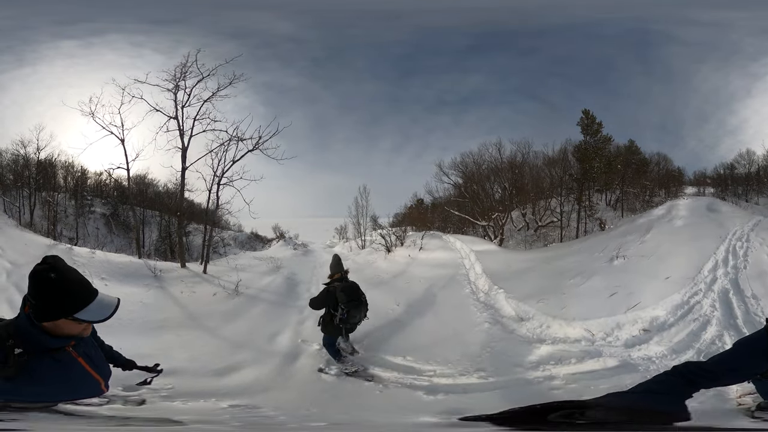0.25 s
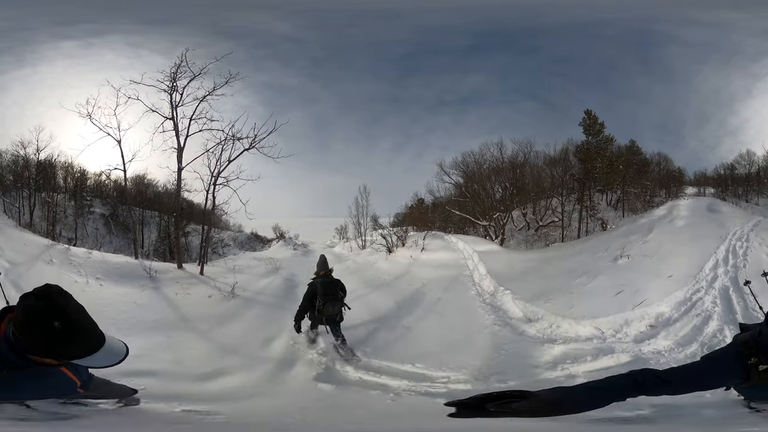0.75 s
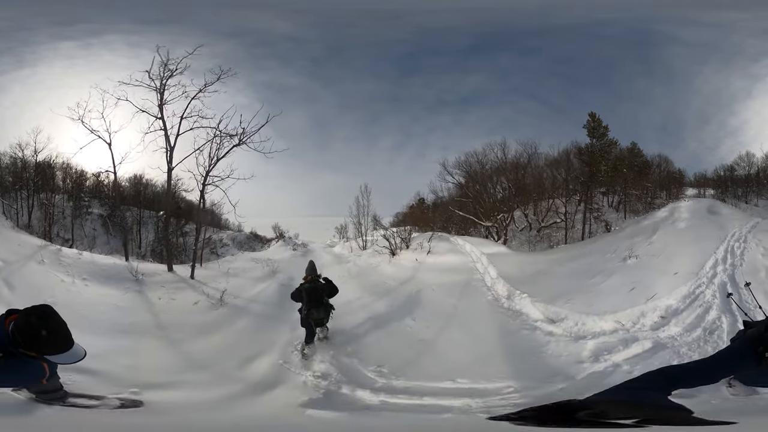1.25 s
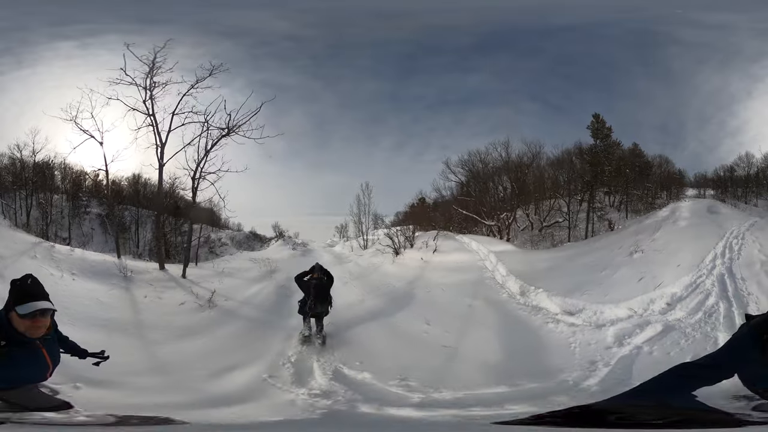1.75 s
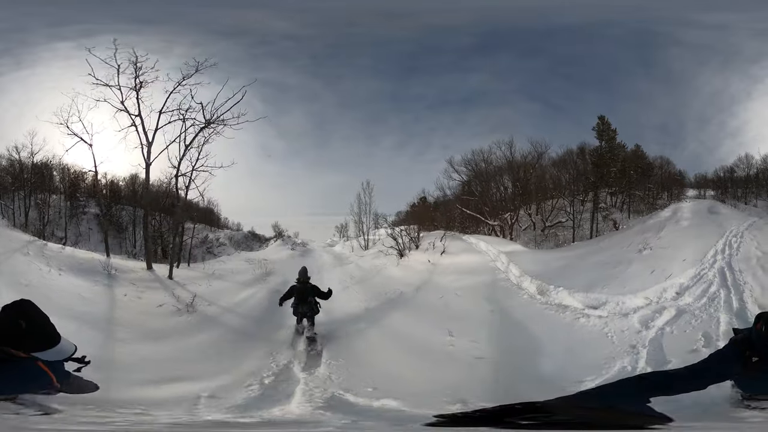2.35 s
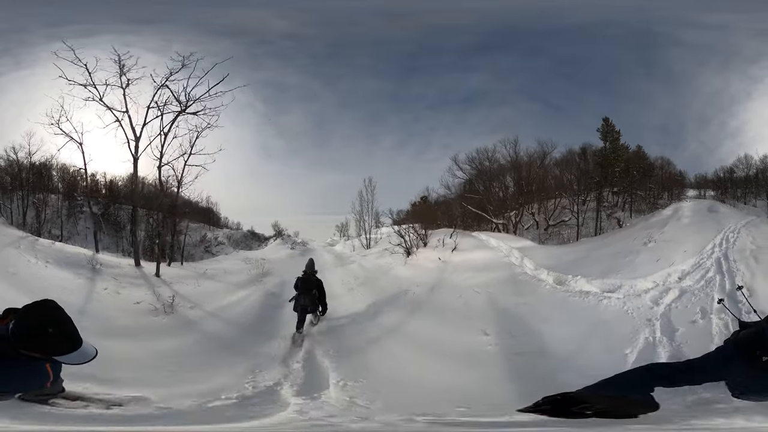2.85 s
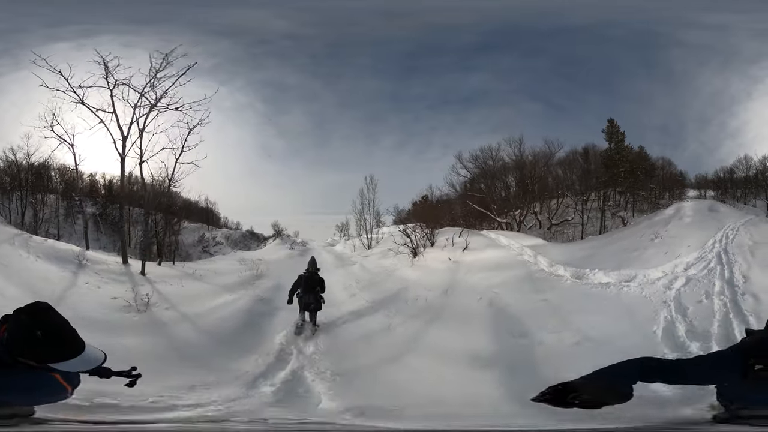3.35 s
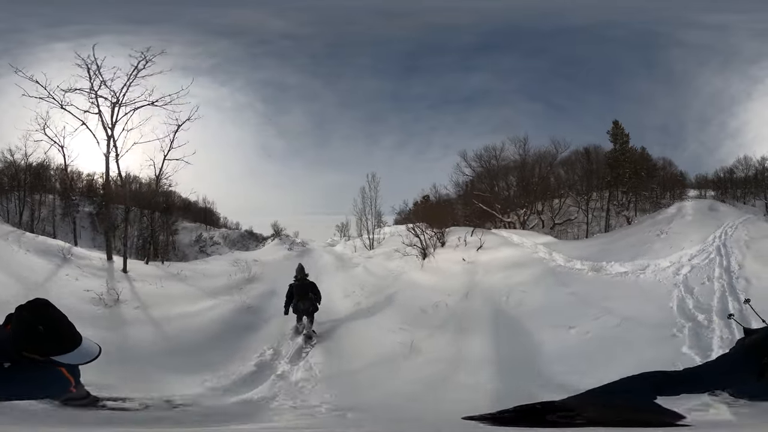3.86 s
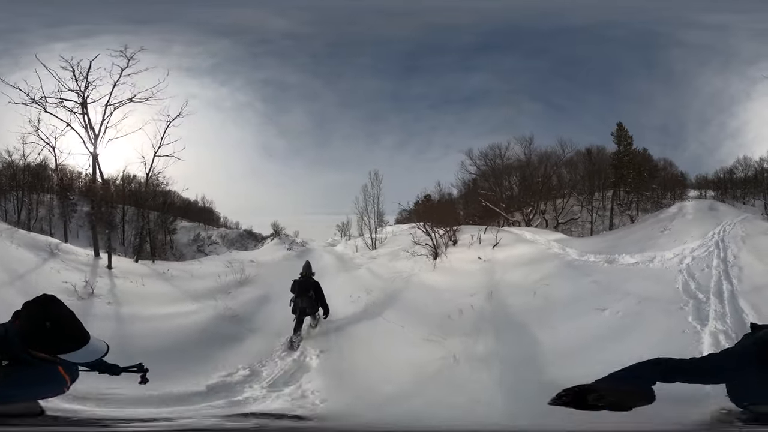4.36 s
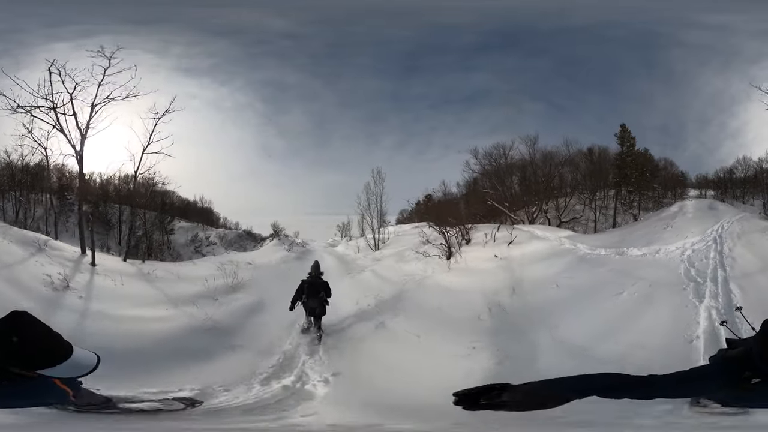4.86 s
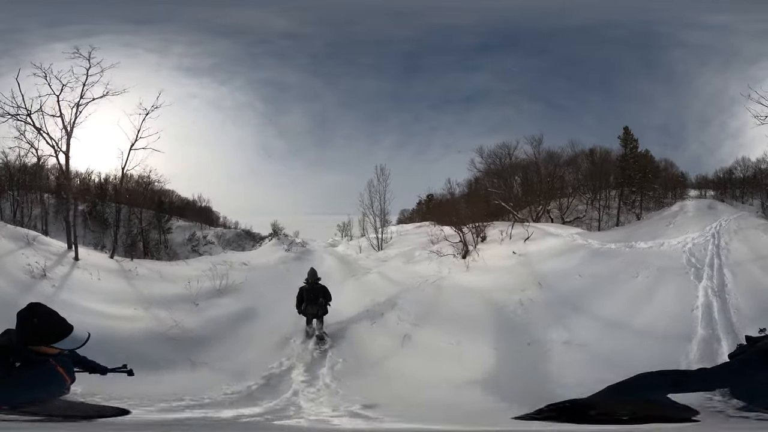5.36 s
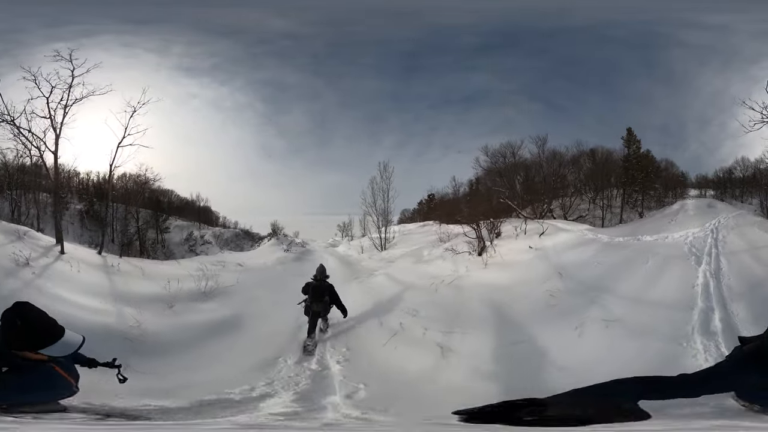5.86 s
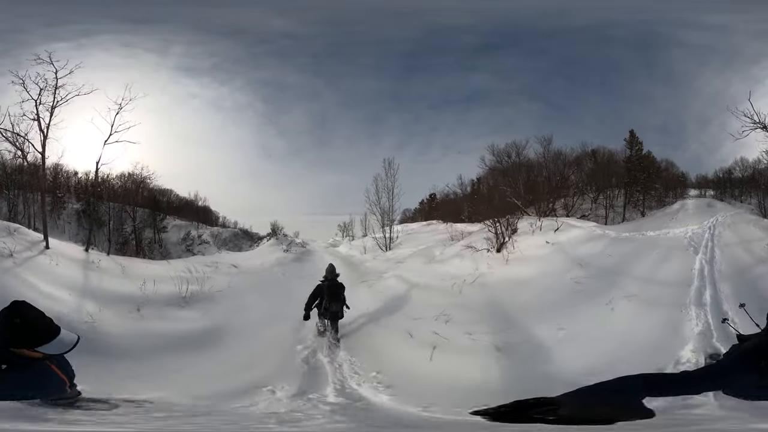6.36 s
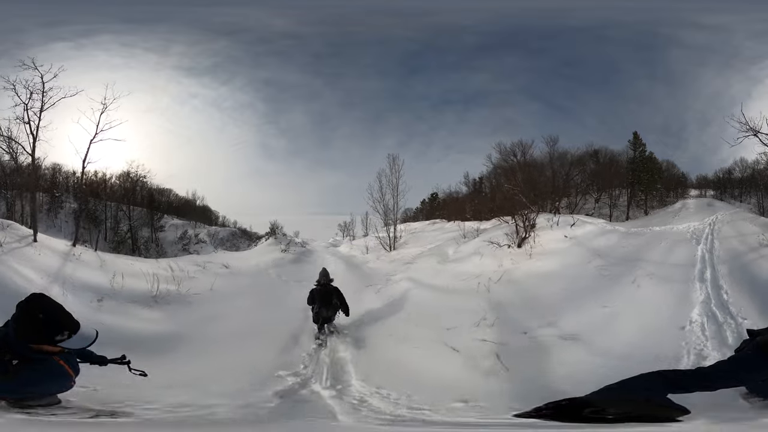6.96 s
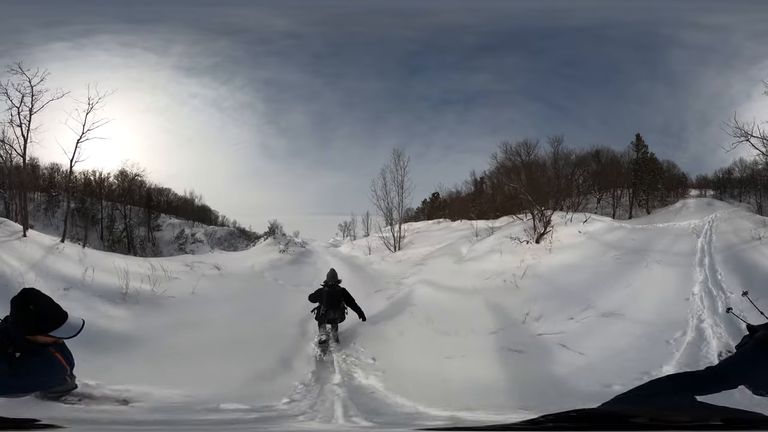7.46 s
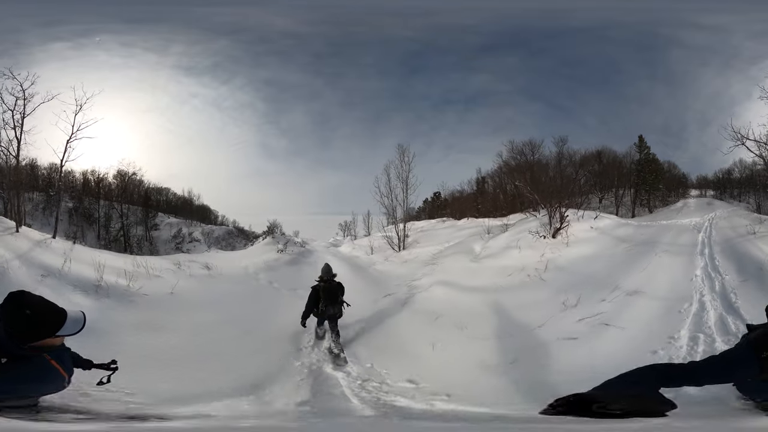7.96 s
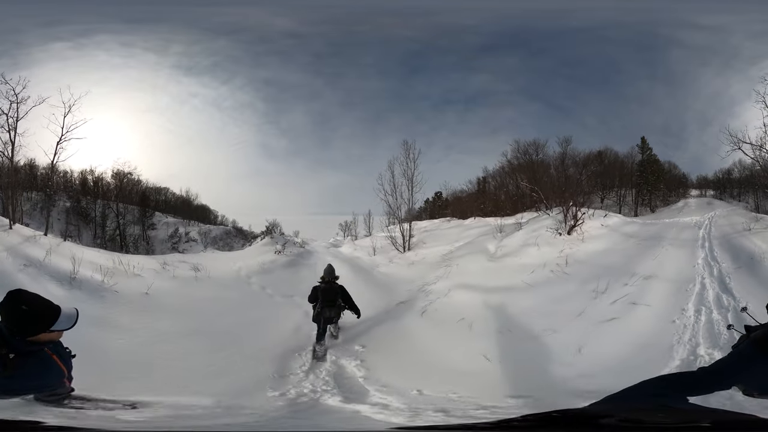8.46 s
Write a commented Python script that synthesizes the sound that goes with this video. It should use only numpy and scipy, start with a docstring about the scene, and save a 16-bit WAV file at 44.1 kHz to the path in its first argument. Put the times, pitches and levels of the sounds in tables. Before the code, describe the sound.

Snowshoes tramp through deep snow on an open hillside, close to the microphone. The steps start faint and uneven, then settle into a walking pace, each a dull, slightly creaky crunch with a soft hiss of powder. Bindings tick irregularly against the frames among short low thuds. Wind is light at first, then buffets the microphone in rumbling gusts from about three seconds on.

```python
"""Snowshoes in deep snow

Snowshoes tramp across an open hillside. Snow packs under each step in dull grains and creaks.
Dull low pops and thuds come from underfoot or from wind on the microphone.
Bindings tick against the frames and ring their damped modes. Powder sprays and slides off the
decks as a hiss, while eddies of wind buffet the microphone."""
import sys
import numpy as np
from scipy import signal
from scipy.io import wavfile
from scipy.ndimage import uniform_filter1d

SR = 44100
rng = np.random.default_rng(int(sys.argv[2]) if len(sys.argv) > 2 else 0)


def generate_wav(sig):
    """Save sig (samples, or channels by samples) to the path in sys.argv[1] as 16-bit PCM at SR."""
    pcm = np.round(np.clip(np.atleast_2d(sig).T, -1, 1) * 32767).astype(np.int16)
    wavfile.write(sys.argv[1], SR, pcm)


N = 383669


def packing():
    """Granular compaction: snow collapses in bunches, muffled by the snow above; heavier is duller."""
    # weight sinking in and coming off: peak_s, level_db, build_s, release_s
    steps = [(0.1, -55, 0.024, 0.36), (0.6, -51, 0.072, 0.29), (0.97, -51, 0.25, 0.056),
             (1.58, -43.5, 0.38, 0.067), (2.08, -48.5, 0.22, 1), (2.966, -41, 0.21, 0.075),
             (3.544, -40.5, 0.28, 0.13), (4.101, -38, 0.23, 0.055), (4.682, -37.5, 0.32, 0.04),
             (5.31, -39.5, 0.25, 0.1), (5.85, -39, 0.13, 0.19), (6.53, -40, 0.22, 0.07),
             (7.083, -36, 0.31, 0.039), (7.619, -42.5, 0.46, 0.075), (8.098, -33.5, 0.079, 0.092),
             (8.629, -39, 0.17, 0.28)]
    # a shoe scuffing as it lands or lifts: peak_s, level_db
    scuffs = [(1.36, -45), (1.67, -45.5), (1.77, -51), (1.88, -48.5), (2.74, -55), (2.836, -42.5),
              (3.127, -52), (3.251, -45.5), (3.81, -46), (4.03, -41.5), (4.799, -48), (5.07, -49),
              (5.159, -38.5), (5.64, -49), (6.101, -44.5), (6.25, -47.5), (6.68, -51.5), (6.83, -46),
              (7.28, -46.5), (7.88, -50), (7.96, -41), (8.4, -43.5), (8.5, -61)]
    # spectrum of collapsing snow: frequency_hz, gain_db
    snow_spectrum = [(80, -16.5), (200, 6.5), (350, 1), (600, -3), (1000, -10.5), (1800, -16), (3000, -29),
                     (5000, -42), (9000, -55.5)]
    settling_db, neutral_db = -64, -43  # steady floor; level at which the treble is unchanged
    step_power = swells(*np.transpose(steps), roundness=1.42)
    scuff_power = swells(*np.transpose(scuffs), rise_s=.058, fall_s=.092, roundness=1)
    level_db = 10 * np.log10(step_power + scuff_power + amp(settling_db) ** 2)
    collapse = evened(grains(per_s=500, spread_db=3.8)) + .95 * rng.standard_normal(N)
    bunches = amp(4.75 * flutter(51))
    crunch = evened(band(colour(collapse * bunches, snow_spectrum), 100, 10000))
    squeeze = crunch + 1.06 * evened(creaks(per_s=220, spread_db=4.4))
    treble = filtered(squeeze, "high", 1100, order=2)
    treble_gain = amp(-.4 * (level_db - neutral_db))
    return amp(level_db) * (squeeze + (treble_gain - 1) * treble) / band(squeeze, 350, 1500).std()


def creaks(per_s, spread_db):
    """Stick-slip: each slipping clump gives a brief falling blip; small clumps sound higher and weaker."""
    slips, out = grains(per_s, spread_db), np.zeros(N)
    clump = rng.integers(0, 12, N)
    for k, hz in enumerate(np.geomspace(280, 1500, num=12)):
        cycles = hz * np.arange(600) / SR
        envelope = cycles * np.exp(-cycles / 1.04) * amp(-5 * np.log2(hz / 500))
        blip = envelope * np.sin(2 * np.pi * cycles * (1 - .06 * cycles))
        out += signal.oaconvolve(slips * (clump == k), blip)[:N]
    return out


def pops():
    """Damped pulses, underfoot or from wind on the microphone: a dull cycle or two, falling in pitch."""
    # dull low pops and thuds: start_s, level_db, final_pitch_hz
    thuds = [(0.391, -41, 254), (0.552, -34, 224), (0.564, -30.5, 224), (0.586, -32, 360),
             (0.606, -23.5, 215), (0.653, -25, 173), (0.678, -28, 172), (0.871, -23, 189),
             (1.401, -28, 278), (1.476, -21.5, 210), (1.597, -24, 280), (1.659, -25.5, 152),
             (1.755, -29.5, 280), (2.207, -27.5, 328), (2.405, -28.5, 172), (2.725, -25, 200),
             (2.876, -29, 157), (2.931, -28, 223), (3.124, -21, 116), (3.162, -22, 112),
             (3.191, -19.5, 100), (3.251, -22, 155), (3.817, -25, 159), (4.03, -19.5, 129),
             (4.087, -21, 312), (4.114, -18.5, 300), (4.535, -25, 178), (4.7037, -17.5, 132),
             (4.815, -40, 180), (5.751, -25.5, 208), (5.787, -25, 177), (5.954, -40, 187),
             (6.37, -34.5, 330), (6.512, -22.5, 237), (6.564, -16, 167), (7.087, -25, 228),
             (7.436, -15.5, 139), (7.506, -21, 173), (7.888, -12.5, 218), (8.506, -25, 198)]
    out, t = np.zeros(N), np.arange(1300) / SR
    for (s, db, hz), sign in zip(thuds, rng.choice([-1., 1.], len(thuds))):
        age = hz * t / .45  # the envelope peaks at age 1
        turns = hz * t + .57 * (1 - np.exp(-t / .001))
        add(out, s, sign * amp(db) * age * np.exp(1 - age) * np.sin(2 * np.pi * turns))
    return out


def ticks():
    """Modal ringing: a blow and a short rattle excite the frame; light touches are mostly rattle."""
    # binding striking frame: start_s, peak_db, brightness_db, body_db
    blows = [(0.0841, -19.5, -33, 5.5), (0.7038, -30, -10, 12.5), (0.7349, -32, -13.5, -5.5),
             (0.867, -42, -24, 0), (1.3622, -32, -6, -18), (1.451, -30, -34, 11), (1.598, -33.5, -36, -8),
             (1.661, -35.5, 1, 13), (1.753, -37, -28, 6), (1.869, -30.5, -63, 4), (1.8759, -29.5, -15, 12),
             (1.9566, -22, -1.5, 4.5), (2.0645, -16, -4.5, 0.5), (2.092, -27, -43, 14),
             (2.665, -32, -7.5, -8), (2.7247, -41.5, -4, -3), (2.818, -37, -1, -11), (2.8235, -31, -18, -3),
             (2.8738, -27, -31, 24), (3.072, -37.5, -30, 14), (3.165, -39, -35, 0), (3.2572, -24, -37, 10),
             (3.325, -40, -15, -13), (3.5136, -37, -33, 18), (3.589, -17.5, -9.5, 6.5),
             (3.818, -38.5, -22, 0), (3.8275, -35.5, 0, -5), (3.9818, -35.5, -1, -7), (3.9878, -41, 4, -8),
             (4.1898, -36, -2, -12), (4.1943, -33.5, -11, 1), (4.212, -35.5, 8, -9), (4.314, -28, -13, -7),
             (4.3312, -35, -2, -13), (4.339, -28, -4, -22), (4.425, -38.5, -29, 7), (5.051, -32, -12, 13),
             (5.2707, -34.5, -40, 4), (5.637, -42, -21, -26), (5.724, -36, -4, -28), (5.748, -37, -11, 1),
             (5.839, -28, -30, 27), (5.9121, -28, -3, 13), (5.959, -51, -20, 0), (6.067, -40.5, -16, -13),
             (6.107, -36.5, -25, -2), (6.246, -32, -12, -28), (6.318, -43, -15, 3), (6.4, -44, -23, -17),
             (6.508, -32, -30, 14), (6.5322, -32, -5, -14), (6.557, -35, -17, -11), (6.5605, -27, -9, 11),
             (6.78, -38.5, -5, 4), (6.839, -30, -28, 7), (6.875, -47, -23, 0), (6.926, -43, -12, -9),
             (6.974, -31.5, -32, -3), (7.0228, -33, -23, 3), (7.1084, -30, 4, -11),
             (7.1924, -33.5, -11, -5), (7.205, -40, -16, 0), (7.367, -30.5, -6, -11),
             (7.372, -28.5, -14, -27), (7.438, -38, -31, -13), (7.503, -35.5, -11, 9),
             (7.6122, -35, -17, 3), (7.763, -22, -1, 9), (7.8556, -18, -10.5, -9), (7.866, -30, -20, -28),
             (7.887, -28, -43, 2), (8.089, -36.5, -35, -5), (8.411, -34.5, -9, -16.5),
             (8.5248, -25.5, -7, 1), (8.5472, -30, -6, -14)]
    # damped modes of the frame: frequency_hz, gain_db, t60_s
    modes = [(570, -8, 0.011), (893, 10, 0.0051), (1437, 6.5, 0.006), (2095, 9.5, 0.003), (3424, 3, 0.0038),
             (5010, 4, 0.0022), (5970, 1, 0.0026), (7410, -6.5, 0.0048), (9510, -6.5, 0.0028)]
    rise_cycles = .45  # each mode builds over this many of its own cycles, so the treble leads
    out, t = np.zeros(N), np.arange(3000) / SR
    rattles = rng.standard_normal((len(blows), len(t))) * (np.exp(-t / .002) + .12 * np.exp(-t / .012))
    detunes = rng.uniform(.95, 1.05, (len(blows), len(modes)))
    for (s, db, bright_db, body_db), rattle, detune in zip(blows, rattles, detunes):
        ring = np.zeros(len(t))
        for (hz, mode_db, t60), ratio in zip(modes, detune):
            # hard contacts reach the modes above 2 kHz, heavy ones those below
            weight_db = np.interp(np.log(hz), np.log([700, 1800, 6000]), [body_db, 0, bright_db])
            onset = 1 - np.exp(-(hz * t / rise_cycles) ** 2)
            decay = amp(mode_db + weight_db - 60 * t / t60)
            ring -= onset * decay * np.sin(2 * np.pi * hz * ratio * t)
        impulse = amp(.5 * db + 30) * (t == 0)
        tick = signal.fftconvolve(impulse + rattle, ring)[:len(t)]
        add(out, s, amp(db) * tick / abs(tick).max())
    return out


def powder():
    """Incoherent addition: countless crystals merge into a hiss, with a few coarser ones standing out."""
    # powder thrown by a swinging shoe: peak_s, level_db, length_s, coarse_offset_db
    swishes = [(0.18, -83.5, 0.23, 15), (1.153, -71.5, 0.11, 7.5), (1.456, -61, 0.086, 3),
               (1.581, -58.5, 0.1, 4.5), (1.741, -61, 0.21, 0.5), (1.971, -63, 0.072, 10),
               (2.43, -59.5, 0.62, -3.5), (2.726, -61, 0.11, -4), (2.89, -67, 0.88, 3.5),
               (3.323, -63, 0.41, 1), (3.557, -63.5, 0.63, 2.5), (3.93, -59, 0.77, -1),
               (4.49, -64.5, 0.61, 8.5), (4.663, -62.5, 0.34, 7), (4.799, -65, 0.091, 8),
               (5.094, -63, 0.5, 2), (5.235, -60.5, 1, 0), (5.398, -50, 0.29, -7), (5.63, -69.5, 0.55, 8.5),
               (5.762, -64.5, 0.098, 4.5), (5.86, -61.5, 0.47, 4.5), (6.097, -62.5, 0.51, 0),
               (6.335, -59.5, 0.31, -4), (6.525, -59, 0.63, -0.5), (6.87, -56.5, 0.68, -2),
               (7.243, -63.5, 0.27, 3), (7.464, -61, 0.7, 0.5), (7.907, -58.5, 0.49, 1),
               (8.14, -62.5, 0.46, 4.5), (8.558, -58, 0.34, 1.5)]
    # powder trickling all along: time_s, level_db
    trickle = [(0.0, -75.5), (0.3, -76.5), (0.45, -74.5), (1.0, -68.5), (2.0, -67.5), (2.6, -68),
               (3.2, -67.5), (3.72, -74), (4.25, -66.5), (4.92, -68.5), (5.5, -69.5), (8.7, -63)]
    # spectrum of sliding crystals: frequency_hz, gain_db
    hiss_spectrum = [(300, -33.5), (900, 3.5), (1500, 3), (2500, -0.5), (4000, -6), (6000, -4), (8000, -4),
                     (14000, -2.5)]
    rise_share, split_hz = .49, 4300
    s, db, length, coarse_db = np.transpose(swishes)
    shape = dict(rise_s=rise_share * length, fall_s=(1 - rise_share) * length, roundness=2.01, depth_db=42.5)
    trickle_power = amp(follow(trickle)[0]) ** 2
    fine_level = np.sqrt(trickle_power + swells(s, db, **shape))
    coarse_level = np.sqrt(trickle_power + swells(s, db + coarse_db, **shape))
    crystals = rng.standard_normal(N) + .5 * evened(grains(per_s=250, spread_db=3.5))
    hiss = colour(crystals, hiss_spectrum)
    fine = filtered(hiss, "high", split_hz, order=4) * amp(1.8 * flutter(25))
    coarse = filtered(hiss, "low", split_hz, order=4) * amp(1.5 * flutter(30))
    return (fine_level * fine + coarse_level * coarse) / band(hiss, 4000, 9000).std()


def wind():
    """Turbulent pressure: large and small eddies roll over the microphone in lumps."""
    # breeze between gusts: time_s, level_db, small_eddy_offset_db
    breeze = [(0.0, -60, -27), (0.09, -43, 2), (0.46, -51.5, 1), (0.82, -56, 5), (1.11, -37.5, -7.5),
              (1.57, -38, 5.5), (1.78, -36, -7.5), (2.04, -63.5, 19.5), (2.14, -34.5, -3), (2.47, -40, -8),
              (3.0, -38.5, -2.5), (3.56, -40, 0.5), (3.95, -33, -3.5), (4.19, -40, -6), (4.5, -32.5, -6.5),
              (5.28, -33.5, -0.5), (6.2, -33.5, -12.5), (6.32, -42, -4), (6.54, -28.5, -5),
              (7.12, -32.5, -4), (8.7, -35.5, -1.5)]
    # gusts: peak_s, level_db, length_s, small_eddy_offset_db
    gusts = [(0.674, -38, 0.19, 5), (0.896, -34, 0.061, -19), (3.205, -31.5, 0.57, 0.5),
             (3.413, -25, 0.17, -0.5), (3.72, -17, 0.028, -19), (3.818, -21.5, 0.11, 4.5),
             (3.92, -19, 0.053, -27), (4.257, -34, 0.11, -27), (4.384, -23, 0.1, -33),
             (4.706, -14, 0.052, -5), (4.812, -28, 0.17, 3), (4.924, -18.5, 0.44, -43),
             (5.503, -19, 0.098, -13.5), (5.634, -22, 0.13, -19), (6.052, -24, 0.44, -4),
             (7.357, -15.5, 0.28, -9.5), (7.484, -23, 0.23, -9), (7.81, -19, 0.39, -4.5),
             (8.218, -23.5, 1, -16), (8.355, -21.5, 0.29, 1.5), (8.454, -20.5, 0.11, -5),
             (8.596, -24, 0.23, -16)]
    # spectrum of the buffeting: frequency_hz, gain_db
    eddy_spectrum = [(12, -30), (25, 0), (45, 1.5), (80, -5), (130, -10.5), (200, -14.5), (300, -31.5),
                     (500, -43), (1000, -82)]
    rise_share = .35
    breeze_db, small_db = follow(breeze)
    s, db, length, tilt_db = np.transpose(gusts)
    shape = dict(rise_s=rise_share * length, fall_s=(1 - rise_share) * length, roundness=1.31)
    large_level = np.sqrt(amp(breeze_db) ** 2 + swells(s, db, **shape))
    small_level = np.sqrt(amp(breeze_db + small_db) ** 2 + swells(s, db + tilt_db, **shape))
    air = colour(rng.standard_normal(N), eddy_spectrum)
    large = steadied(filtered(air, "low", 85, order=3), size=3000)
    small = filtered(air, "high", 120, order=3) * amp(4.2 * flutter(20))
    return large_level * evened(large) + small_level * evened(small)


def swells(s, db, rise_s, fall_s, roundness, depth_db=20):
    """Power sum of sounds that climb depth_db to a peak and drop again; roundness 1 is a pointed peak."""
    t = np.arange(0, N / SR, .002)[:, None]
    away = abs(np.maximum((s - t) / rise_s, (t - s) / fall_s)) ** roundness
    power = (amp(db - depth_db * away) ** 2).sum(axis=1)
    return np.interp(np.arange(N) / SR, t[:, 0], power)


def grains(per_s, spread_db):
    """Shot noise: sparse clicks of either sign, a few of them large."""
    size = amp(spread_db * np.minimum(rng.exponential(1, N), 4))
    return size * rng.choice([-1., 1.], N) * (rng.random(N) < per_s / SR)


def flutter(hz):
    """Random modulation of rms 1, low-passed at hz."""
    return evened(filtered(rng.standard_normal(N), "low", hz, order=2))


def steadied(x, size):
    """Compression: takes out part of the chance swelling of a narrow noise."""
    return x / (abs(uniform_filter1d(x ** 2, size)) + 1e-20) ** .2


def colour(x, spectrum, size=8192):
    """Minimum-phase filter with the given spectrum, interpolated in log frequency."""
    hz, db = np.transpose(spectrum)
    bins_hz = abs(np.fft.fftfreq(size, 1 / SR))
    log_gain = np.log(amp(np.interp(np.log(bins_hz + 1), np.log(hz + 1), db)))
    taps = np.fft.ifft(np.exp(np.conj(signal.hilbert(log_gain)))).real[:size // 2]
    return signal.oaconvolve(x, taps)[:len(x)]


def filtered(x, kind, hz, order):
    """Maximally flat filter."""
    return signal.sosfilt(signal.butter(order, hz, kind, fs=SR, output="sos"), x)


def band(x, low_hz, high_hz):
    """Band-pass filter."""
    return filtered(x, "band", [low_hz, high_hz], order=2)


def follow(rows):
    """Linear interpolation of timed columns at every sample."""
    s, *columns = np.transpose(rows)
    return [np.interp(np.arange(N) / SR, s, c) for c in columns]


def add(mix, s, sound):
    """Mixes a sound in at time s."""
    part = mix[round(s * SR):][:len(sound)]
    part += sound[:len(part)]


def amp(db):
    """Decibels to gain."""
    return 10 ** (np.asarray(db) / 20)


def evened(x):
    """Scales to rms 1."""
    return x / np.sqrt(np.mean(x ** 2) + 1e-20)


def scene():
    """Superposition: all sources add at one nearby microphone."""
    return (wind() + packing() + powder() + ticks() + pops())[None]


def record(dry):
    """Filtering and saturation: the microphone port dulls the treble; strong gusts overload it gently."""
    # microphone response: frequency_hz, gain_db
    response = [(20, -1.5), (3600, 0.5), (4850, -1.5), (5050, 1), (6500, -1), (7800, -5), (9000, -13),
                (11000, -26), (12500, -38), (15000, -38.5)]
    ceiling, band_limit_hz = .42, 14400
    heard = ceiling * np.tanh(colour(dry[0], response) / ceiling)
    low_pass = signal.firwin(511, band_limit_hz, window=("kaiser", 9), fs=SR)
    return signal.oaconvolve(heard, low_pass, "same")[None]


dry = scene()
out = record(dry)
generate_wav(out)
```